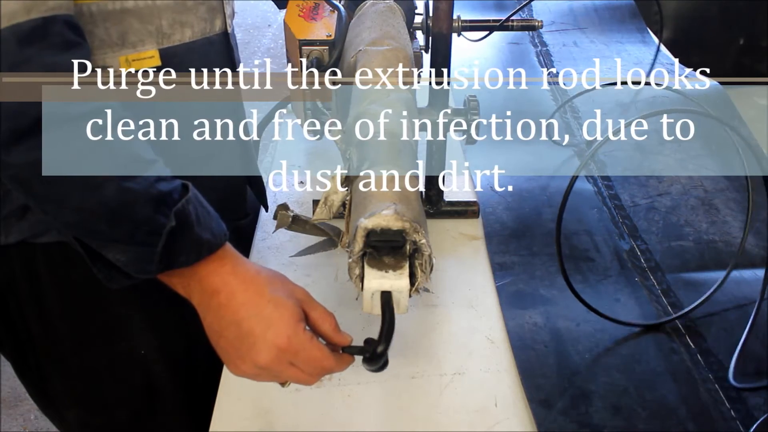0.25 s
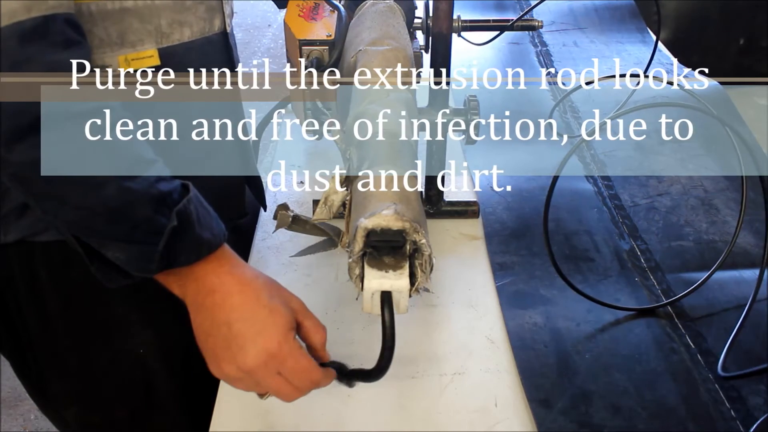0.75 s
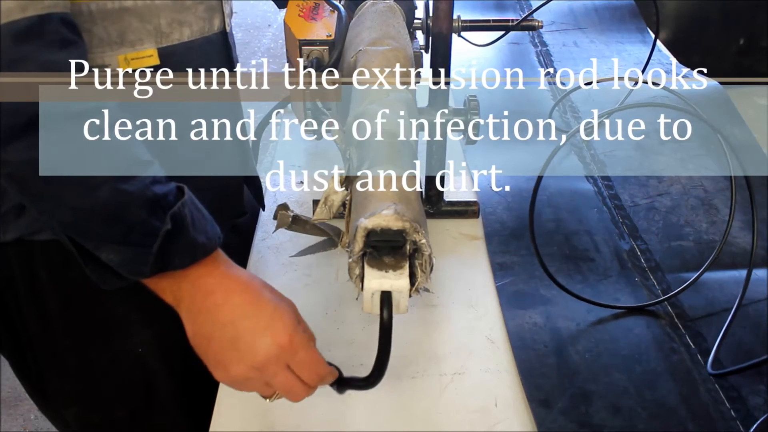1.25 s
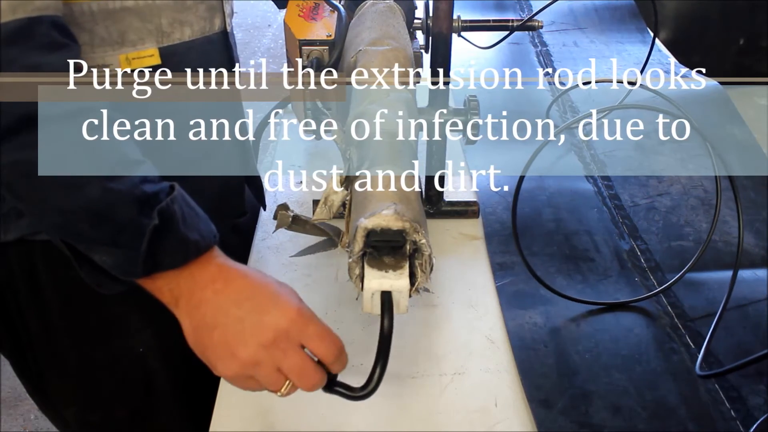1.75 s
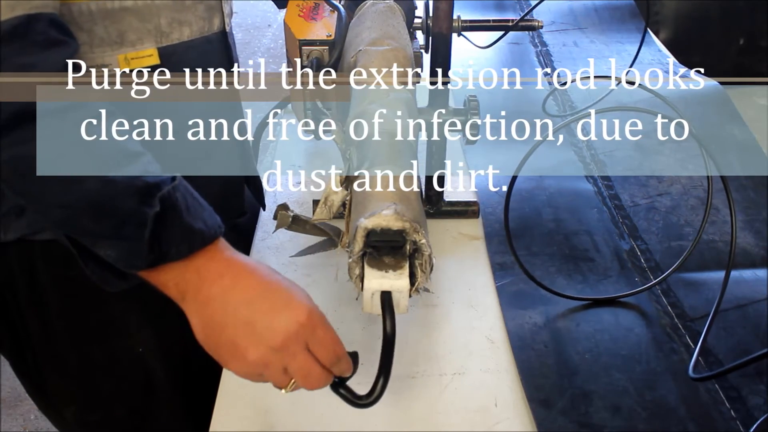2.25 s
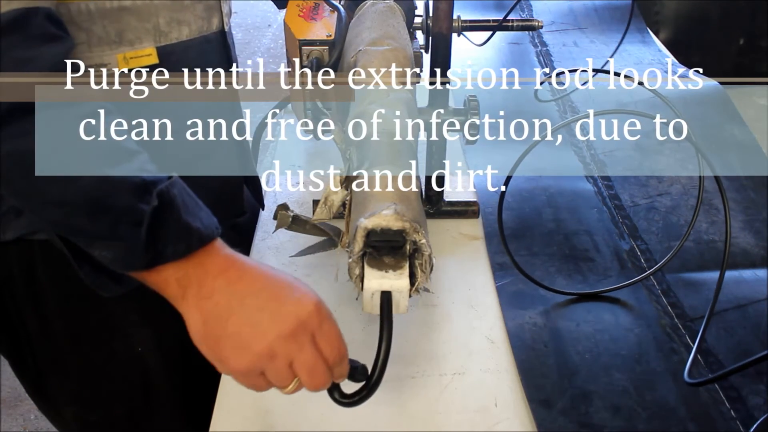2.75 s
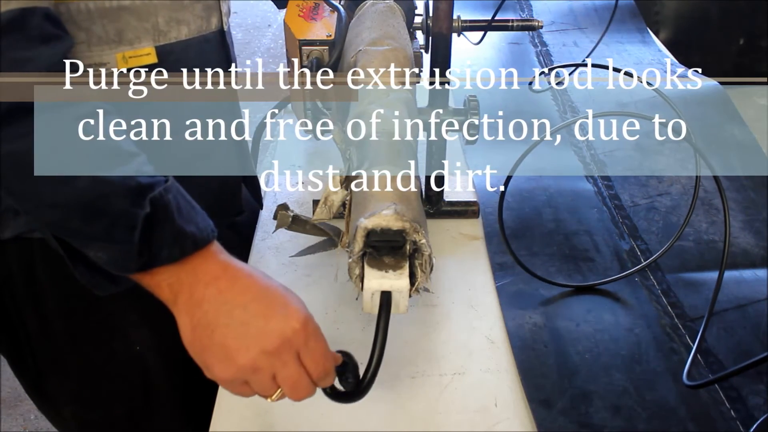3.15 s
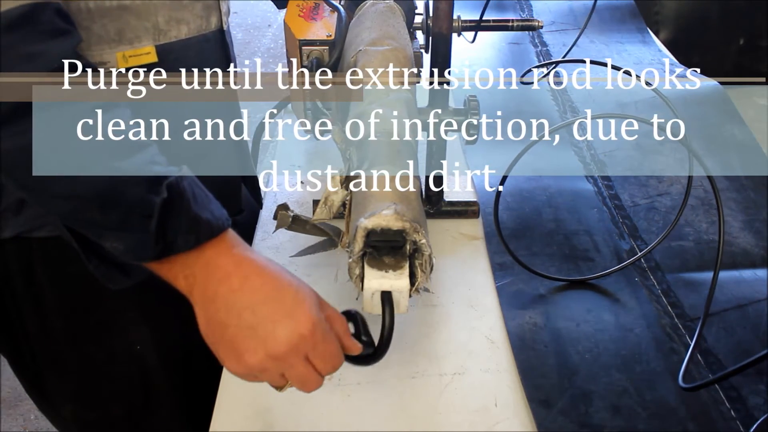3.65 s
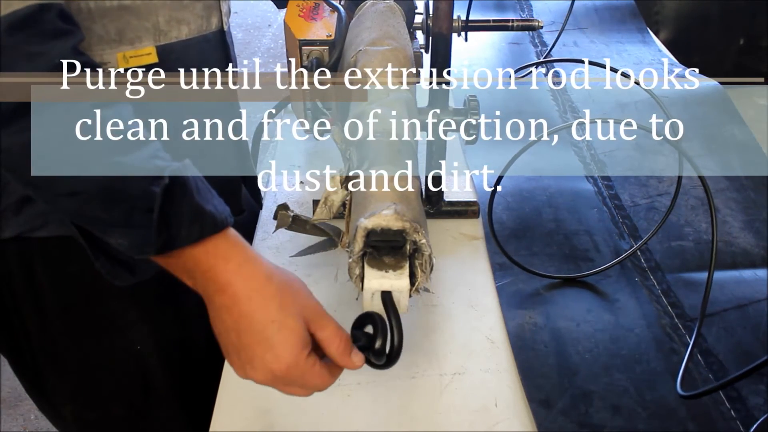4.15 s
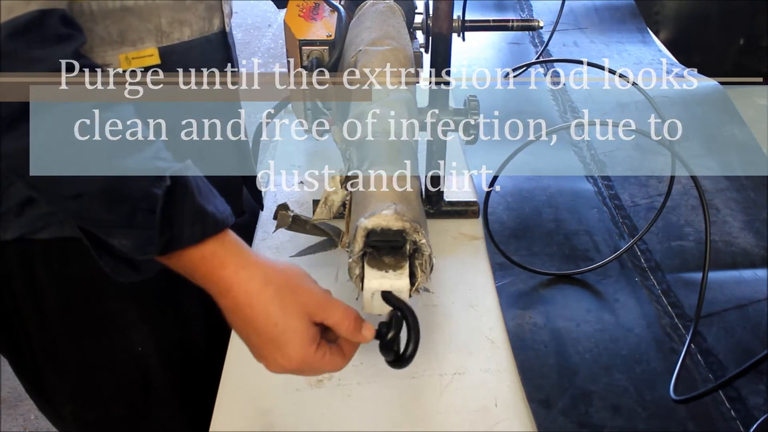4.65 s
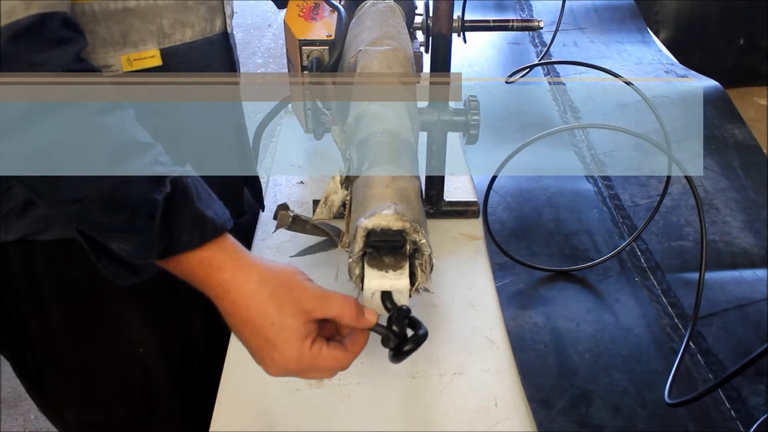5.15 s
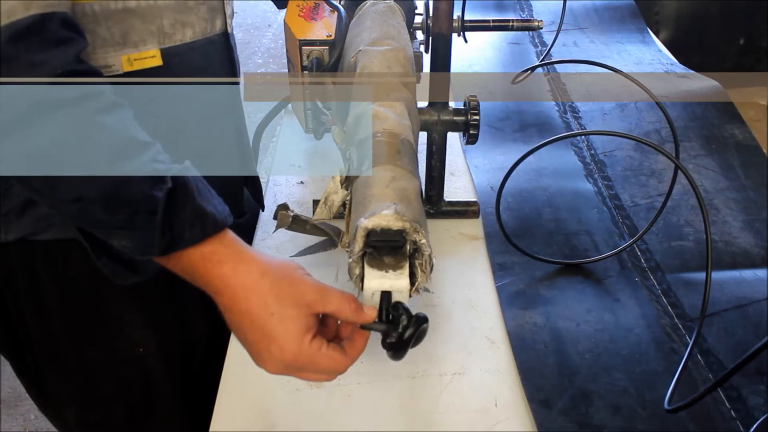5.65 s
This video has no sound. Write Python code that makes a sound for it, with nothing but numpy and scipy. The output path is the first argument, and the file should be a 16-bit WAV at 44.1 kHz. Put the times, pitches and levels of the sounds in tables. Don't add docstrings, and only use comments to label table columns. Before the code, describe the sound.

A hand-held plastic extruder whines steadily on a workshop bench, its pitch wavering about three times a second over rushing air, gradually fading down.

```python
import sys
import numpy as np
from scipy import signal
from scipy.fft import rfft, irfft
from scipy.io import wavfile
from scipy.ndimage import uniform_filter1d

SR = 44100
rng = np.random.default_rng(int(sys.argv[2]) if len(sys.argv) > 2 else 0)


def waveform_to_disk(signal):
    frames = np.transpose(np.atleast_2d(signal))
    scaled = np.clip(frames, -1, 1) * 32767
    samples = np.round(scaled).astype(np.int16)
    wavfile.write(sys.argv[1], SR, samples)


def elevation(decibels):
    levels = np.asarray(decibels, float)
    return 10 ** (levels / 20)


N = 259749


def in_time(rows):
    s, *columns = np.transpose(rows)
    return [np.interp(np.arange(N) / SR, s, column) for column in columns]


def drift(rate_hz, depth_db):
    step = 40
    warm_up = 2000
    r = np.exp(-2 * np.pi * rate_hz * step / SR)
    noise = rng.standard_normal(N // step + warm_up + 2)
    slow = signal.lfilter([1], [1, -2 * r, r * r], noise)[warm_up:]
    slow = slow / np.sqrt(np.mean(slow ** 2) + 1e-20)
    return np.interp(np.arange(N) / step, np.arange(len(slow)), elevation(depth_db * slow))


def order(turns, multiple):
    return np.sqrt(2) * np.sin(2 * np.pi * (multiple * turns + rng.random()))


# (time_s of the hardest bite, slowest_turns_per_s, recovered_turns_per_s)
SCREW_BITES = [(0.04, 320.4, 326.2), (0.33, 318.7, 324.6), (0.62, 317.7, 326.0), (0.93, 319.4, 326.8),
               (1.23, 320.7, 327.1), (1.54, 319.1, 327.1), (1.83, 319.9, 326.4), (2.13, 320.1, 327.9),
               (2.44, 319.5, 325.6), (2.73, 318.1, 323.6), (3.03, 315.5, 323.9), (3.34, 315.7, 322.0),
               (3.63, 315.6, 320.5), (3.94, 312.3, 320.1), (4.26, 314.0, 320.3), (4.54, 313.8, 322.7),
               (4.85, 315.1, 322.4), (5.14, 317.5, 324.9), (5.45, 317.0, 324.4), (5.75, 318.8, 326.2)]


def drive():
    stroke_s, recovery_share, inertia_s = .3, .52, .05
    hiss_lead_s, hiss_db_per_hz = .03, .11
    bite_s, slowest, fastest = np.transpose(SCREW_BITES)
    free_s = bite_s + recovery_share * np.diff(bite_s, append=bite_s[-1] + stroke_s)
    corner_s = np.ravel([bite_s, free_s], "F")
    corner_speed = np.ravel([slowest, fastest], "F")
    ramps = in_time(np.transpose([corner_s, corner_speed]))[0]
    speed = uniform_filter1d(ramps, size=round(inertia_s * SR), mode="nearest")

    swing = speed - uniform_filter1d(speed, size=round(stroke_s * SR))
    ahead = np.interp(np.arange(N) + hiss_lead_s * SR, np.arange(N), swing)
    blow = elevation(hiss_db_per_hz * ahead) * drift(6, 0.3)
    return speed, blow


# (speed_turns_per_s, then level_db over hiss of
RESONANCE_LEVELS = [(313.5, -11, -1.5, -6.5, -3, -17, -25, -10, -15),
                    (317, -12.5, -5.5, -11, -4, -17, -17, -7, -15.5),
                    (318.7, -12, -6, 3.5, 1, -16, -6, -8, -13.5),
                    (317.8, -11.5, -3.5, -7.5, -6, -13, -13.5, -16, -7.5),
                    (322, -10, -4, -6.5, -8, -11.5, -9.5, -8.5, -20),
                    (322.75, -7.5, -5, -8, -18, -14.5, -17.5, -22, -13.5),
                    (325.1, -4, -3, -5, -9.5, -14, -12.5, -11, -19),
                    (327.7, -4.5, 2, -10, -16, -10, -4.5, -25, -15.5)]


def responses(speed):
    build_up_s = (.03, .04, .04, .01, .003, .003, .01, .01)
    t = np.arange(N) / SR
    at_speed, *columns = np.transpose(RESONANCE_LEVELS)
    return [np.interp(np.interp(t - lag_s, t, speed), at_speed, level_db)
            for lag_s, level_db in zip(build_up_s, columns)]


# (time_s, level_db)
MELT_PUSH = [
    (0, -0.5),
    (.8, -1),
    (1.3, -1),
    (1.75, 2.5),
    (2.5, -1),
    (3.1, 2.5),
    (4.1, 1.5),
    (5, 0.2),
    (5.89, 1.3),
]


def motor_whine(turns, beads, order_levels_db):
    first_db, second_db, fourth_db, sixth_db = order_levels_db
    second_db = second_db + in_time(MELT_PUSH)[0]
    from_middle_s = (np.arange(N) - N / 2) / SR
    sixth_db = sixth_db - 0.5 * from_middle_s
    whine = 0
    for multiple, level_db, waver_db in ((1, first_db, .7), (2, second_db, 1.0),
                                         (4, fourth_db, 1.6), (6, sixth_db, 1.4)):
        tone = order(turns, multiple) * beads ** (multiple / 9)
        whine = whine + elevation(level_db) * drift(12.8, waver_db) * tone
    return whine


def family(turns, table, swell_db, swell_rate_hz):
    slow_loss = {4.773: .7, 4.906: 1.5, 6.406: .7, 8: .8, 12.28: .5, 16.37: -.7, 24: 1.0, 26: -.5, 44: -.8}
    knee_hz, lift_db_per_order = 321, .065
    speed = np.gradient(uniform_filter1d(turns, size=900)) * SR
    slowed = elevation(-(knee_hz - speed).clip(0, 8))
    out = 0
    for multiple, level_db in table:
        level = elevation(level_db + lift_db_per_order * multiple) * slowed ** slow_loss.get(multiple, 0)
        out = out + level * drift(swell_rate_hz, swell_db) * order(turns, multiple)
    return out


def swelling_tone(turns, multiple, level_db):
    return elevation(level_db) * drift(32, 1.9) * order(turns, multiple)


# (multiple of rotor speed, level_db over hiss)
ROTOR_TONES = [(3, -11.9), (5, -16.6), (7, -18.8), (8, -17.6), (9, -22.5), (10, -22.7), (13, -25.7),
               (14, -23.8), (15, -24.3), (17, -25.8), (19, -24.6), (20, -21.1), (21, -29.0), (22, -19.5),
               (23, -23.3), (24, -19), (25, -30.0), (26, -25.4), (27, -29.5), (30, -24.2), (31, -31.5),
               (33, -33.3), (34, -31.1), (36, -24.9), (37, -32.5), (39, -30.8), (41, -33.7), (42, -32.8),
               (43, -32.4), (44, -32.4)]


def rotor_and_fan(turns, beads, fan_12_db, fan_18_db):
    weak = elevation(-0.7) * family(turns, ROTOR_TONES, swell_db=1.8, swell_rate_hz=18.0)
    fan = swelling_tone(turns, 12, fan_12_db) + swelling_tone(turns, 18, fan_18_db)
    return beads * (weak + fan)


# (multiple of rotor
# speed, level_db over hiss)
GEAR_TONES = [(0.508, -41.7), (0.805, -31.2), (1.312, -25.7), (1.625, -24.9), (1.93, -27.1), (2.047, -24.3),
              (2.617, -23.8), (3.547, -24.8), (3.578, -19.2), (3.68, -25.5), (4.141, -20.3), (4.773, -21.7),
              (4.906, -14.7), (6.406, -22.2), (8.18, -23.6), (12.28, -21.2), (16.37, -21.6),
              (8.864, -27), (9.136, -28), (10.23, -26), (12.136, -26), (14.32, -27), (16.86, -28),
                    (18.41, -28), (19.23, -27)]


def gearbox(turns, first_mesh_db, second_mesh_db):
    weak = elevation(-0.6) * family(turns, GEAR_TONES, swell_db=2.1, swell_rate_hz=16.0)
    first_mesh = swelling_tone(turns, 4.094, first_mesh_db)
    second_mesh = swelling_tone(turns, 5.863, second_mesh_db)
    gears = weak + first_mesh + second_mesh

    mode_hz, width_hz, lift_db = 1547, 12, 9
    r = np.exp(-np.pi * width_hz / SR)
    feed = (1 - r * r) / 2 * np.array([1, 0, -1])
    feedback = [1, -2 * r * np.cos(2 * np.pi * mode_hz / SR), r * r]
    return gears + (elevation(lift_db) - 1) * signal.lfilter(feed, feedback, gears)


# (pitch_hz, level_db per Hz)
AIR_COLOUR = [(30, -20), (60, -14.5), (130, -2), (250, 12.5), (400, 14), (600, 19), (900, 20.5), (1500, 21),
              (2500, 19.5), (4000, 19.5), (6000, 17), (8500, 13), (12000, 9), (15500, 6)]
# (pitch_hz, width_hz, lift_db)
HOUSING_MODES = [(508, 110, 3.5), (811.6, 8.9, 10), (830, 22, 4), (1640, 8.2, 4), (2114, 440, 4),
                 (2720, 14, 9), (2785, 24, -6), (3300, 200, 5), (5400, 170, 4), (5950, 610, 3),
                 (7300, 740, 0.5), (7720, 110, 2), (11400, 200, 1.5), (12700, 200, 2.5)]


def air(turns):
    hz = np.maximum(np.arange(N // 2 + 1) * SR / N, 1)
    colour_hz, level_db = np.transpose(AIR_COLOUR)
    colour_db = np.interp(np.log(hz), np.log(colour_hz), level_db)
    for centre_hz, width_hz, lift_db in HOUSING_MODES:
        colour_db = colour_db + lift_db / (1 + (2 * (hz - centre_hz) / width_hz) ** 2)
    noise = rfft(rng.standard_normal(N)) * elevation(colour_db)
    noise = noise / np.sqrt(2 * np.sum(np.abs(noise[hz > 2100]) ** 2)) * N

    chop_db = 1.1 * np.cos(2 * np.pi * turns) + .6 * np.cos(4 * np.pi * turns)
    mains_ripple = np.cos(2 * np.pi * 100 * np.arange(N) / SR)
    shared = drift(30, 0.2)
    out = 0
    for octave in range(10):
        centre_hz = 31.25 * 2 ** octave
        band = irfft(noise * np.clip(1 - np.abs(np.log2(hz / centre_hz)), 0, 1), N)
        bright = centre_hz / (centre_hz + 5000)
        flicker = shared * drift(9.4, 0.53 + 17.0 / (1 + (centre_hz / 45) ** 2))
        out = out + band * flicker * elevation(bright * chop_db + 1.1 * (1 - bright) ** 4 * mains_ripple)
    return elevation(-1.5) * out


def room(x):
    t60_s, wet = .4, elevation(-11.0)
    age_s = np.arange(round(.5 * SR)) / SR
    tail = rng.standard_normal(len(age_s)) * elevation(-60 * age_s / t60_s) * (age_s > .004)
    tail = tail / np.sqrt(np.sum(tail ** 2))
    echoes = signal.fftconvolve(x, tail)[:N]
    return (x + wet * echoes) / np.sqrt(1 + wet ** 2)


# (time_s, level_db)
FADE_DOWN = [(0.0, -21), (0.35, -20), (0.69, -20), (1.04, -19.5), (1.39, -20.5), (1.73, -21), (2.08, -22),
             (2.43, -22), (2.77, -21.5), (3.12, -22), (3.46, -24.0), (3.81, -23.5), (4.16, -24.5),
             (4.5, -25.5), (4.85, -25.5), (5.2, -27.5), (5.54, -28.1), (5.89, -29)]


def scene():
    speed, blow = drive()
    first, second, fourth, sixth, fan_12, fan_18, mesh_1, mesh_2 = responses(speed)
    uneven_turns = .002 * 9 * (drift(30, 1) - 1)
    turns = np.cumsum(speed) / SR + uneven_turns
    beads = elevation(1.2 * np.cos(2 * np.pi * 3 / 22 * turns))

    whine = motor_whine(turns, beads, (first, second, fourth, sixth))
    machine = rotor_and_fan(turns, beads, fan_12, fan_18) + gearbox(turns, mesh_1, mesh_2)
    extruder = whine + blow * (room(machine) + air(turns))
    faded = elevation(in_time(FADE_DOWN)[0]) * extruder
    return np.stack([faded, faded])


# (middle_s, low_hz, high_hz)
TREBLE_PATCHES = [(0.435, 4630, 5730), (0.435, 11690, 13150), (0.528, 10230, 11710), (0.528, 13690, 15820),
                  (1.039, 6200, 7660), (1.225, 8850, 10330), (1.225, 14380, 15930), (1.318, 8310, 9620),
                  (1.318, 10330, 11800), (1.318, 14450, 15930), (1.829, 14450, 15930), (2.038, 9560, 11040),
                  (2.107, 4560, 5730), (2.247, 10960, 12440), (2.572, 10250, 11780), (2.757, 4240, 5230),
                  (2.897, 5620, 6980), (3.059, 13690, 15240), (3.315, 10940, 12440), (3.802, 8180, 9670),
                  (3.895, 5100, 6370), (4.267, 8290, 9690), (4.685, 8220, 9670), (4.801, 4220, 5170),
                  (4.824, 14400, 15930), (5.172, 13740, 15220), (5.521, 9560, 11090), (5.521, 11670, 13130),
                  (5.706, 12360, 13840)]


def part_channels(x):
    size, hop, offset = 2048, 1024, 772
    out = x.copy()
    hz = np.arange(size // 2 + 1) * SR / size
    window = np.sin(np.pi * (np.arange(size) + .5) / size)
    for middle_s, low_hz, high_hz in TREBLE_PATCHES:
        start = offset + hop * round((middle_s * SR - offset) / hop - 1)
        patch = slice(start, start + size)
        band = irfft(rfft(x[0, patch] * window) * ((hz > low_hz) & (hz < high_hz)))
        early, late = band[::-1].reshape(2, -1)
        folded = np.concatenate([early - early[::-1], late + late[::-1]]) * window
        out[:, patch] += 0.62 * folded * [[1], [-1]] - 0.37 * band * window
    return out


def top_cut(x):
    return signal.sosfilt(signal.butter(12, 15730, fs=SR, output="sos"), x)


def record(dry):
    hz = np.arange(N // 2 + 1) * SR / N
    cut = irfft(rfft(dry) * (hz < 15730), N)
    mix = part_channels(cut)
    return top_cut(mix)


dry = scene()
out = record(dry)
waveform_to_disk(out)
```